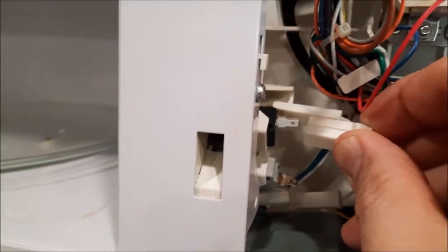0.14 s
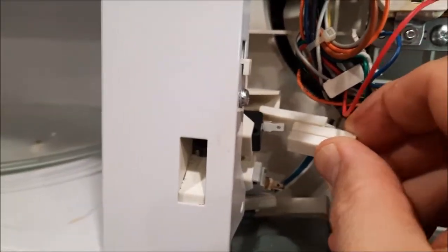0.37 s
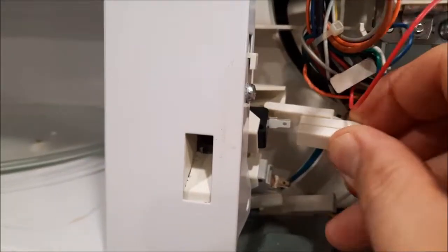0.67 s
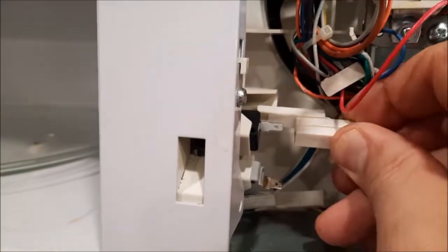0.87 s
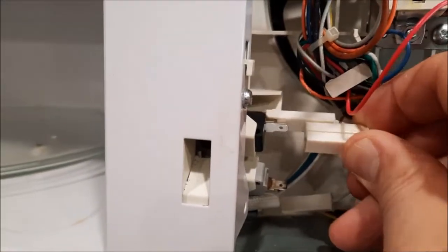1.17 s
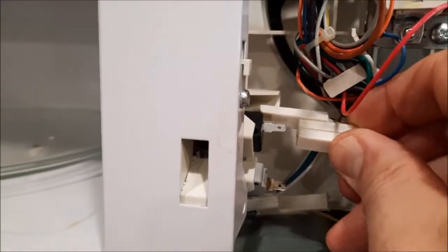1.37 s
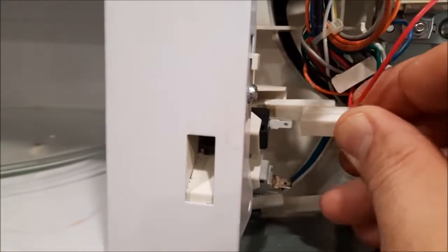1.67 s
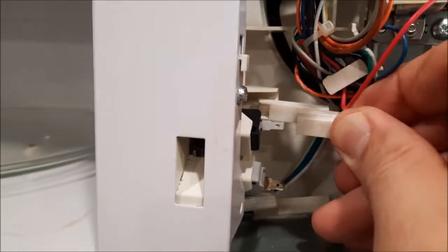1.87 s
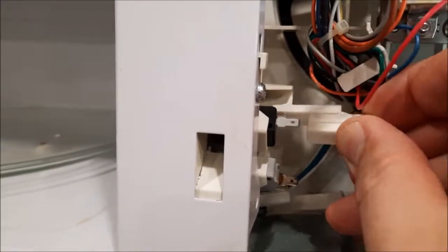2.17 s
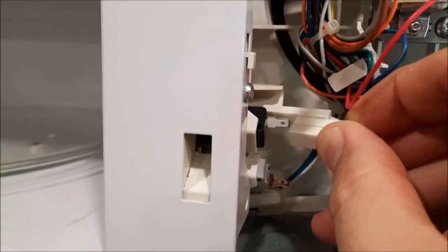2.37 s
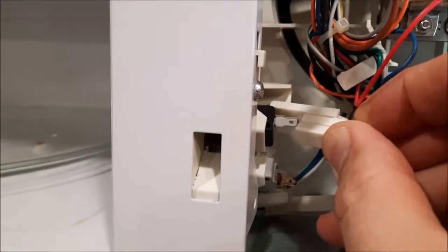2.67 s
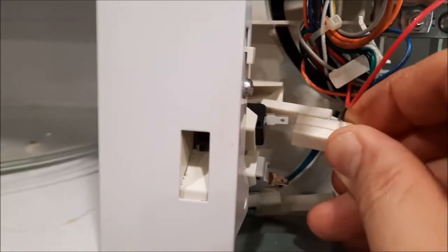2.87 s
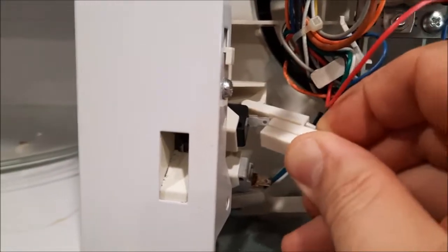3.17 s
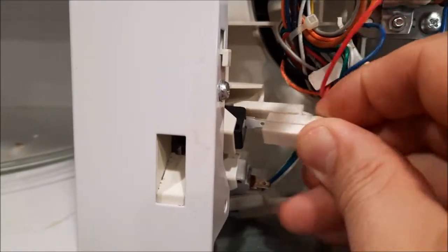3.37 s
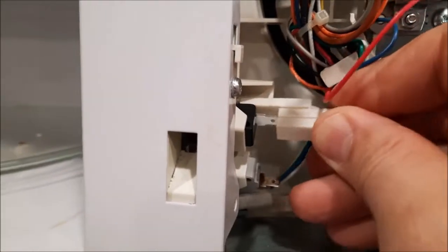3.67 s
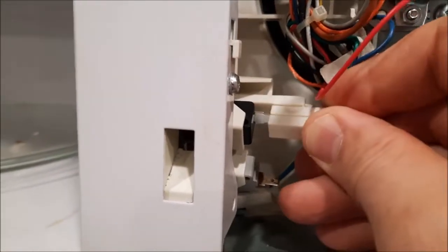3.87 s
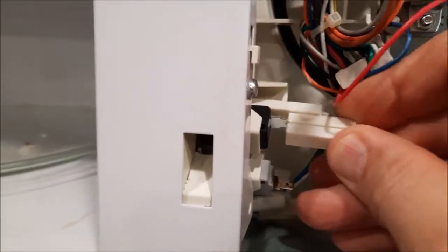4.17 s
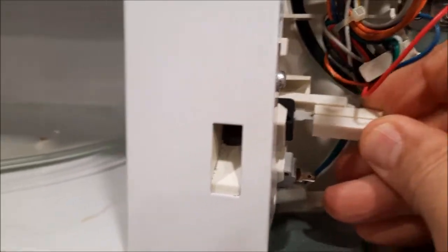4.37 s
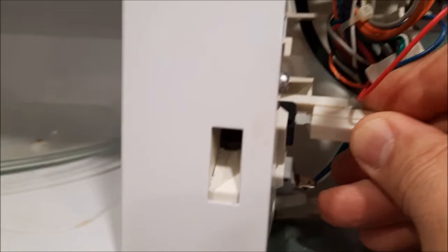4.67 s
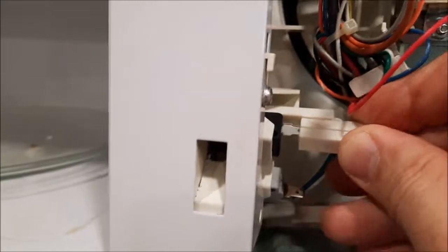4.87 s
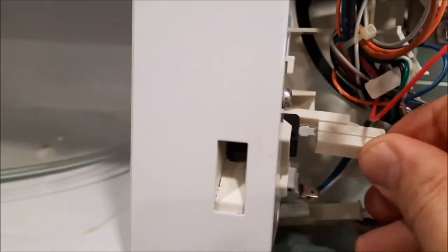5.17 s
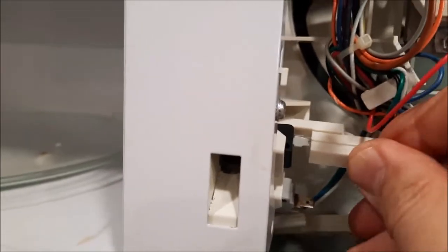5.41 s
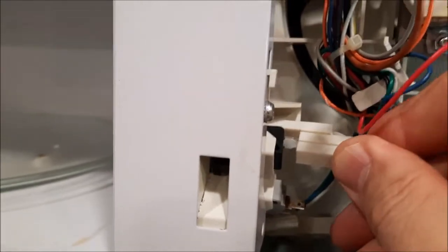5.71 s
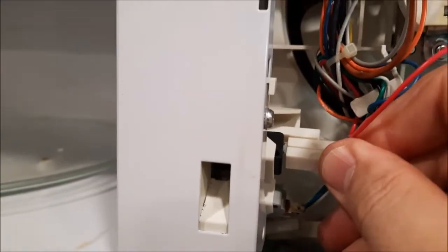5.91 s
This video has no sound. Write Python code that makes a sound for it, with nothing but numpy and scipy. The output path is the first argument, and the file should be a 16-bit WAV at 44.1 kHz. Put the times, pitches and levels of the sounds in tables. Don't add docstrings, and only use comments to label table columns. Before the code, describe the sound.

Close, small clicks and dull panel thuds in a humming room, with one loud snap midway and another bright, metallic snap at the end.

```python
import sys
import numpy as np
from scipy import signal
from scipy.fft import rfft, irfft, next_fast_len
from scipy.io import wavfile
from scipy.ndimage import uniform_filter1d

SR = 44100
rng = np.random.default_rng(int(sys.argv[2]) if len(sys.argv) > 2 else 0)


def dump_mix(stems):
    frames = np.atleast_2d(stems).T
    limited = np.clip(frames, -1, 1)
    pcm = np.round(limited * 32767).astype(np.int16)
    wavfile.write(sys.argv[1], SR, pcm)


def ratio_of_db(decibels):
    return 10 ** (np.asarray(decibels, float) / 20)


N = 266628

# frequency in [Hz], correlation [0-1].
PORT_LIKENESS = [(60, 0.92), (130, 0.84), (290, 0.78), (640, 0.41), (1400, 0.055), (4000, 0.021)]
# time in [s], level in [dB].
MOTOR_LOAD = [(0, 0), (.45, -3), (1.1, 1), (2.45, .5), (2.75, -1.5), (3.8, 1), (4.8, 2), (5.6, -1.5),
              (6.05, 3)]
# frequency in [Hz], level in [dB], time to fall 60 dB in [s].
CABINET_MODES = [(104, -5, .5), (168, -8, .4), (195, -9, .35), (232, -6, .3), (264, 0, .22), (328, -5, .2),
                 (395, -14, .2), (484, -14, .2), (560, -12, .17)]


def at(table, hz):
    f, v = np.transpose(table)
    return np.interp(np.log(np.maximum(hz, 1)), np.log(f), v)


def band(x, hz, octaves):
    size = next_fast_len(x.shape[-1])
    f = np.fft.rfftfreq(size, 1 / SR) + 1
    bell = np.exp(-.5 * (np.log2(f / hz) / octaves) ** 2)
    return irfft(rfft(x, size) * bell, size)[..., :x.shape[-1]]


def peak_one(x):
    return x / np.abs(x).max()


def fall(t, t60):
    return np.exp(-np.log(1000) * t / t60)


def walk(rate):
    k = int(SR / rate)
    steps = np.repeat(rng.standard_normal(N // k + 1), k)
    return 1.67 * uniform_filter1d(uniform_filter1d(steps, k), k)[:N]


def two_ports(mid, side, hz):
    like = np.clip(at(PORT_LIKENESS, hz), 0, 1)
    return np.sqrt(1 + like) * mid + np.sqrt(1 - like) * side * np.array([[1], [-1]])


def add(out, s, sound, left_db, lag):
    for channel, (db, late) in enumerate([(left_db / 2, 0), (-left_db / 2, lag)]):
        i = int(s * SR) + late
        piece = np.atleast_2d(sound)[-channel, :N - i]
        out[channel, i:i + len(piece)] += ratio_of_db(db) * piece


def ring(modes, scatter_db, damp=0.84):
    hz, db, t60 = np.transpose(modes)[:, :, None]
    level_chance, pitch_chance = rng.standard_normal((2, len(modes), 1))
    t = np.arange(SR // 2) / SR
    tones = np.sin(2 * np.pi * hz * (1 + 0.0061 * pitch_chance) * t)
    return (ratio_of_db(db + scatter_db * level_chance) * fall(t, damp * t60) * tones).sum(axis=0)


def crowd(peaks, t60, valley_db, shock, shock_s):
    t = np.arange(SR // 3) / SR
    f = np.fft.rfftfreq(len(t), 1 / SR) + 1
    colour = sum(ratio_of_db(db) / np.sqrt(1 + ((f - hz) / (width / 2)) ** 4) for hz, width, db in peaks)
    colour = colour + ratio_of_db(valley_db) * np.exp(-np.log2(f / peaks[2][0]) ** 2 / 3.4)
    mid, side = rfft(rng.standard_normal((2, len(t)))) * colour
    noise = irfft(two_ports(mid, side, f), len(t))
    envelope = fall(t, t60) + shock * np.exp(-t / shock_s)
    return noise * envelope * (1 - np.exp(-t / 0.00042))


def fan():
    # frequency in [Hz], level in [dB per Hz].
    air_colour = [(20, -49), (55, -10), (90, -12), (200, -14.5), (285, -4.5), (450, -13), (560, -20.5),
                  (900, -24.5), (1150, -29.5), (1520, -28.5), (1750, -40), (2100, -34.5), (2600, -32),
                  (3300, -48.5)]
    # frequency in [Hz], level in [dB per Hz], same scale.
    hiss_colour = [(1000, -57), (3500, -46), (8600, -46.5), (9400, -50.5), (15000, -52), (16000, -65)]
    # middle in [s], half-length in [s], rise in [dB].
    gusts = [(.72, .1, 6), (1.35, .28, 11), (2.14, .12, 4), (3.05, .33, 7), (3.92, .1, 9), (4.3, .35, 4),
             (5.2, .4, 9)]
    f = np.fft.rfftfreq(N, 1 / SR)
    colour = np.hypot(ratio_of_db(at(air_colour, f)) * (f < 4000), ratio_of_db(at(hiss_colour, f)))
    mid, side = rfft(rng.standard_normal((2, N))) * colour
    air = irfft(two_ports(mid, side, f), N)
    air = air * ratio_of_db(-50.5) / air.std()
    t = np.arange(N) / SR
    rush = -4.5 + sum(db * np.exp(-((t - s) / half) ** 2) for s, half, db in gusts)
    rumble = np.interp(t, *np.transpose(MOTOR_LOAD))
    out = 0
    for hz in 22 * 2 ** np.arange(0, 10, .5):
        rush_share = np.exp(-(np.log2(hz / 1350) / 0.53) ** 2)
        rumble_share = np.exp(-np.log2(hz / 300) ** 2)
        drift = rush * rush_share + rumble * rumble_share
        left_db = 0.8 * np.log2(hz / 900) * np.array([[.5], [-.5]])
        flicker = 0.81 * walk(6) * min(1500 / hz, 1)
        out = out + band(air, hz, 0.22) * ratio_of_db(drift + left_db + flicker)
    return out


def hum():
    # frequency in [Hz], level in [dB rms].
    mains = [(59.6, -57), (119.5, -52.5), (179.5, -70)]
    t = np.arange(N) / SR
    lines = 0
    for hz, db in mains:
        lines = lines + ratio_of_db(db + 2 + 1.0 * walk(6)) * np.sin(2 * np.pi * hz * t + 0.75 * walk(5))
    load_db = 0.6 * np.interp(t, *np.transpose(MOTOR_LOAD))
    return lines * ratio_of_db(load_db) * ratio_of_db(np.array([[-.9], [.9]]))


def touches():
    # start in [s], crack in [dB],
    # bracket in [dB above crack], crack centre in [Hz].
    ticks = [(0.085, -48, -6, 10800), (0.0941, -46, -5, 10100), (0.1062, -42, -6, 6000),
             (0.1162, -37.5, -1, 4990), (0.167, -42.5, -6, 6100), (1.4441, -28.5, -3, 3030),
             (2.171, -38.5, 1, 8400), (2.9527, -54, 5.5, 3320), (3.1029, -44, -15, 5730),
             (4.5356, -50.5, -13, 4690), (5.0274, -45, 0, 3140), (5.1086, -42, -3.5, 3600)]
    # start in [s], crack in [dB],
    # bracket in [dB above crack], cabinet in [dB above crack], crack centre in [Hz].
    taps = [(0.1276, -49, -0.5, 8.5, 5040), (1.0301, -35, 0, 0, 4990), (1.3065, -39.5, 13, 2, 1300),
            (1.326, -44, 7, 11, 3280), (2.613, -54, -2, 12, 3130), (3.2106, -48, 4, 4, 3560),
            (3.4422, -39.5, -1, 2, 5800), (4.7636, -57, 6, 12, 3620), (4.9, -56, -6, 12, 3310),
            (5.1274, -45, 2.5, 5, 4590)]
    # start in [s], crack in [dB],
    # bracket in [dB above crack], cabinet in [dB above crack], crack centre in [Hz].
    hard_snaps = [
        (3.7903, -12.5, -6, -9, 5300),
        (3.7941, -16, 1.5, 0, 12000),
        (5.8347, -32, 8, 5, 3600),
        (5.8390, -18, 0, -3, 3000),
    ]
    # frequency in [Hz], width in [Hz], level in [dB].
    bracket_peaks = [(550, 123, -0.5), (730, 78, 3), (953, 136, -3.5), (1415, 120, -1), (1513, 82, 3.5),
                     (2218, 255, -2), (2694, 370, -6), (3550, 420, -14.5)]
    touch_ms, snap_ms = 1.9, 2.9
    light = [(s, db, bracket_db, -15, hz) for s, db, bracket_db, hz in ticks]
    thin_peaks = [(hz, width, db + 3 * np.log2(hz / 2000)) for hz, width, db in bracket_peaks]
    out = np.zeros((2, N))
    t = np.arange(SR // 4) / SR
    rattle = ratio_of_db(-13.5) * fall(t, 0.12)
    kinds = ((touch_ms, thin_peaks, light), (touch_ms, bracket_peaks, taps),
             (snap_ms, bracket_peaks, hard_snaps))
    for ms, peaks, rows in kinds:
        contact = np.exp(-t / (ms / 1000))
        for s, db, bracket_db, cabinet_db, hz in rows:
            grit = rng.standard_normal((2, len(t))) * (contact + rattle) * (1 - np.exp(-t / 0.00046))
            crack = .5 * band(grit, 3450, 1.45) + 0.47 * band(grit, hz, 0.32)
            add(out, s, ratio_of_db(db) * peak_one(crack), left_db=2.4, lag=4)
            bracket = crowd(peaks, t60=0.19, valley_db=-13, shock=.8, shock_s=0.007)
            add(out, s, ratio_of_db(db + bracket_db + 2.5) * peak_one(bracket), left_db=2.5, lag=4)
            push = np.hanning(int(.004 * SR))
            cabinet = signal.convolve(push, ring(CABINET_MODES, scatter_db=1.5))
            add(out, s + 0.0025, ratio_of_db(db + cabinet_db - 3) * peak_one(cabinet), left_db=5.0, lag=3)
    return out


def scrapes():
    # start in [s], length in [s], level in [dB], centre in [Hz], width in [octaves].
    slides = [(0.089, .05, -54, 2300, .5), (.17, .06, -67, 5030, 1.7), (0.741, 0.14, -66, 1700, 0.36),
              (1.16, 0.12, -63.5, 1500, 1.03), (1.296, 0.016, -53.5, 6000, 0.99),
              (1.46, 0.36, -61, 1180, .1), (2.073, 0.096, -66, 3980, 0.96), (3.455, .055, -57, 1050, 1.0),
              (4.118, .25, -60.5, 1320, 0.22), (4.948, 0.064, -64.5, 6000, 1.1),
              (5.003, 0.04, -57, 3000, 1.3), (2.8, .35, -66, 1080, .2), (1.2, .09, -56, 730, .08),
              (5.11, .07, -58, 2800, 1.1), (5.827, .016, -34, 2600, 1.2)]
    out = np.zeros((2, N))
    for s, length, db, hz, octaves in slides:
        count = int(length * SR)
        slips = ratio_of_db(3 * rng.exponential(size=count // 40 + 1)).repeat(40)[:count]
        grit = band(rng.standard_normal((2, count)) * slips, hz, octaves)
        swell = np.hanning(count) ** 0.62
        add(out, s, ratio_of_db(db) * grit / grit.std() * swell, left_db=2, lag=0)
    return out


def room(x):
    # frequency in [Hz], time to fall 60 dB in [s].
    room_t60 = [(100, 0.57), (500, 0.31), (2000, 0.25), (6000, 0.27), (14000, 0.17)]
    t = np.arange(int(.6 * SR)) / SR
    tail = 0
    for hz in 60 * 2 ** np.arange(9.):
        mid, side = band(rng.standard_normal((2, len(t))), hz, 0.4)
        tail = tail + two_ports(mid, side, hz) * fall(t, at(room_t60, hz))
    tail = tail * (1 - np.exp(-t / 0.0037)) / np.sqrt(SR * 0.015)
    return ratio_of_db(-10.5) * signal.fftconvolve(x[None], tail)[:, :N]


def thuds():
    # start in [s], thud in [dB], favoured mode in [Hz].
    pushes = [(1.046, -36, 480), (1.058, -38, 200), (1.169, -41, 124), (1.325, -28, 400), (1.344, -30, 330),
              (1.384, -31, 150), (2.438, -39, 118), (3.214, -33, 420), (3.232, -31, 330), (3.243, -33, 130),
              (4.118, -44, 118), (4.775, -43, 124)]
    # start in [s],
    # thud in [dB], favoured mode in [Hz].
    rebounds = [(3.82, -9, 300), (3.853, -18, 125), (3.883, -18, 194), (3.915, -26, 150), (3.95, -27, 200),
                (3.999, -29, 125), (4.025, -30, 250), (5.856, -17, 290), (5.866, -13, 290),
                (5.872, -22.5, 105), (5.898, -23, 280), (5.931, -26, 300), (5.959, -26, 270),
                (5.999, -32, 108), (6.02, -28, 300)]
    out = np.zeros((2, N))
    for s, db, hz in pushes + rebounds:
        push_ms = 4.0 * np.sqrt(250 / hz)
        push = -np.diff(np.hanning(int(push_ms * SR / 1000)))
        modes = []
        for f, level_db, t60 in CABINET_MODES:
            octaves_off = min(abs(np.log2(f / hz)), 1.3)
            modes.append((f, level_db - 12 * octaves_off, t60))
        thud = signal.convolve(push, ring(modes, scatter_db=1.5, damp=.35))
        add(out, s, ratio_of_db(db - 3) * peak_one(thud), left_db=1.5, lag=16)
    return out


def snaps():
    # start in [s], level in [dB], then modes, each frequency in [Hz], level in [dB],
    # time to fall 60 dB in [s].
    first_snap = (3.7925, -15, [(104, -1, .6), (187, -1, .35), (345, -2, .12), (420, 0, .14),
                  (555, -4, .12), (720, -5, .2), (910, 3, .09), (990, 4, .1), (1409, -4, .1),
                  (2800, -9, .08)])
    # start in [s], level in [dB], then modes, each frequency in [Hz], level in [dB],
    # time to fall 60 dB in [s].
    second_snap = (5.836, -16, [(106, -6, .6), (262, 0, .4), (340, -5, .15), (395, -6, .15), (585, -9, .2),
                   (728, -9, .22), (1338, 0, .1), (1509, 6, .12), (2682, 3, .16), (3060, -2, .12)])
    out = np.zeros((2, N))
    for s, db, modes in (first_snap, second_snap):
        frame = signal.convolve(np.hanning(16), ring(modes, scatter_db=0))
        add(out, s, ratio_of_db(db) * peak_one(frame), left_db=2.5, lag=9)
    return out


def blade():
    # frequency in [Hz], width in [Hz], level in [dB].
    blade_peaks = [(5250, 550, -9), (8600, 450, -10), (11720, 370, 2.5), (13600, 584, -11),
                   (14500, 1300, -5)]
    out = np.zeros((2, N))
    song = crowd(blade_peaks, t60=0.07, valley_db=-32, shock=4.5, shock_s=.0025)
    add(out, 5.8388, ratio_of_db(-7.5) * peak_one(song), left_db=4.0, lag=4)
    return out


def scene():
    work = touches() + scrapes() + thuds() + snaps() + blade()
    work = signal.sosfilt(signal.butter(2, 75, "high", fs=SR, output="sos"), work)
    return work + room(work.mean(axis=0)) + fan() + hum()


def top_cut(x):
    return signal.sosfilt(signal.butter(12, 16620, fs=SR, output="sos"), x)


def record(dry):
    dry = signal.sosfilt(signal.butter(3, 45, "high", fs=SR, output="sos"), dry)
    dry = signal.sosfilt(signal.butter(12, 15600, fs=SR, output="sos"), dry)
    return top_cut(dry)


dry = scene()
out = record(dry)
dump_mix(out)
```